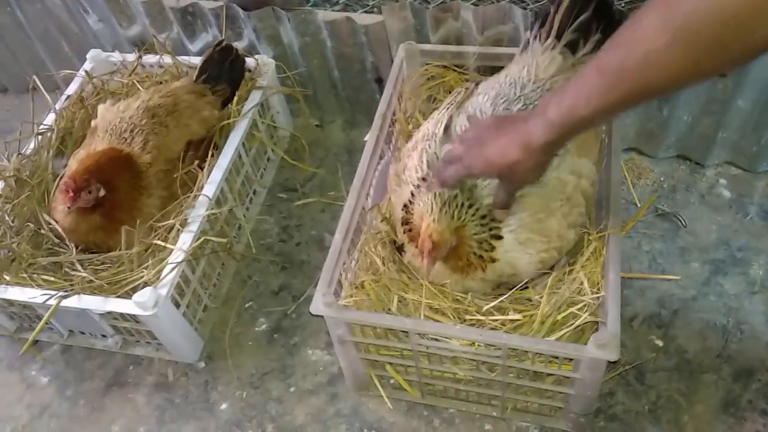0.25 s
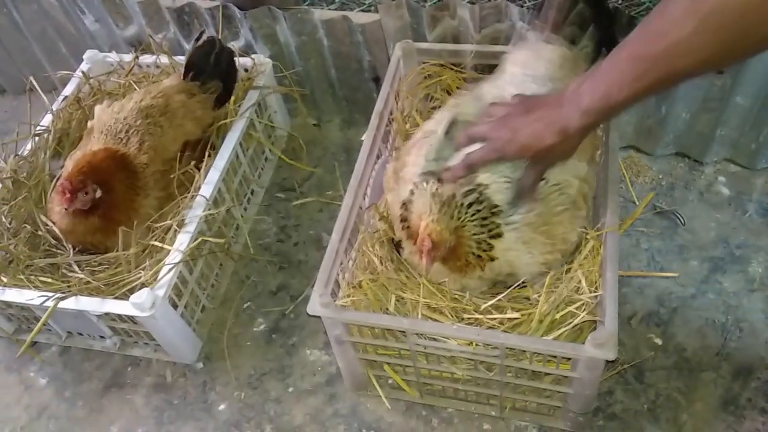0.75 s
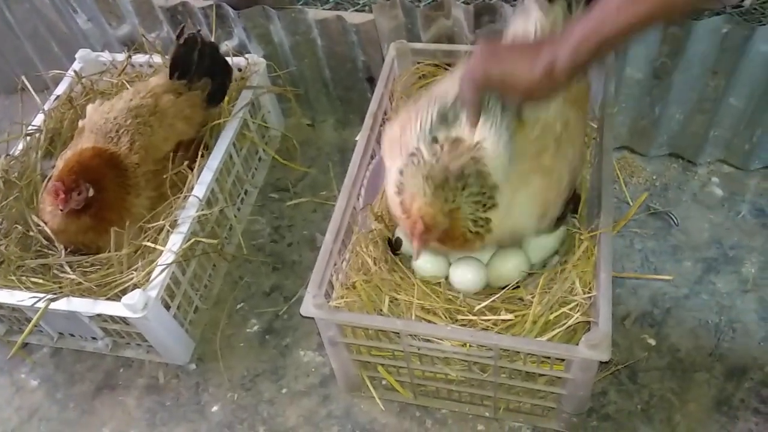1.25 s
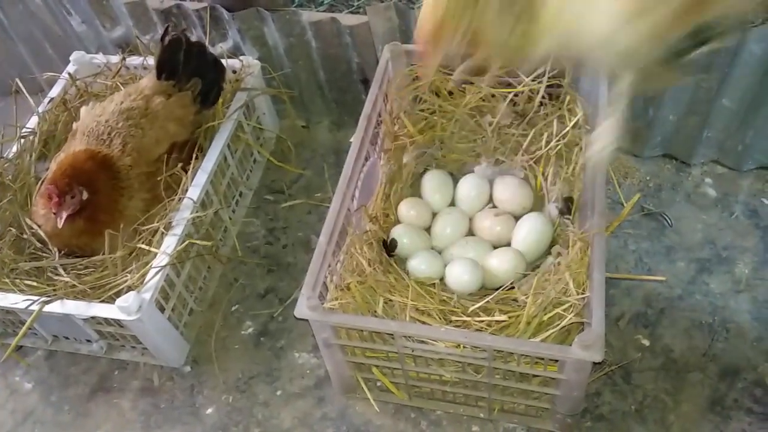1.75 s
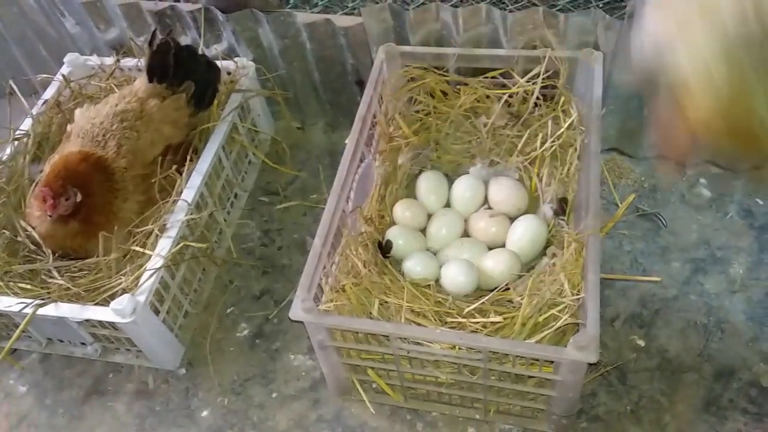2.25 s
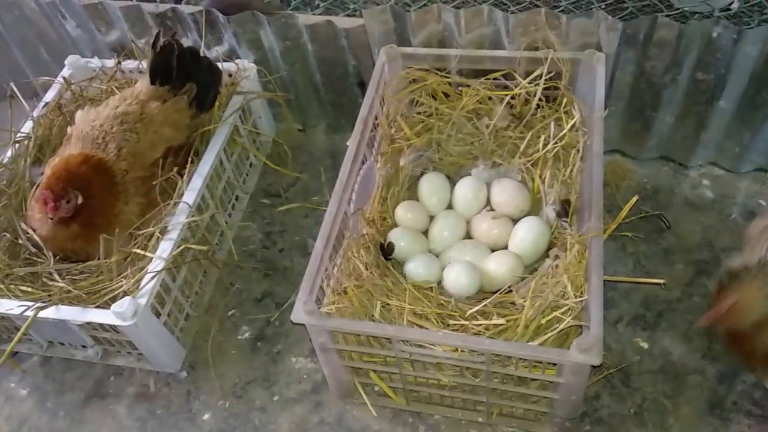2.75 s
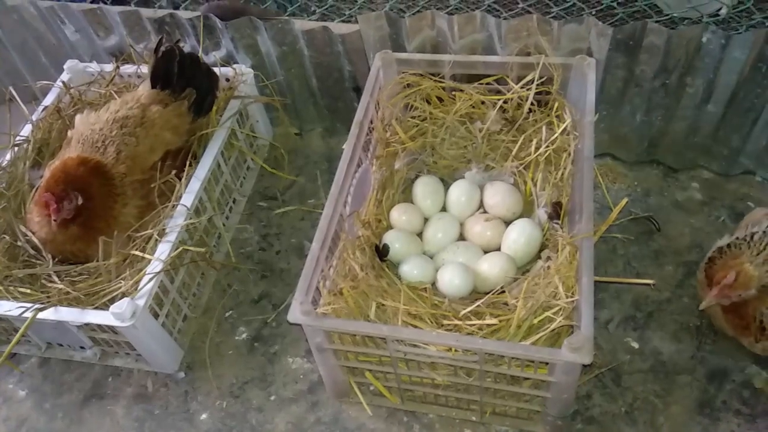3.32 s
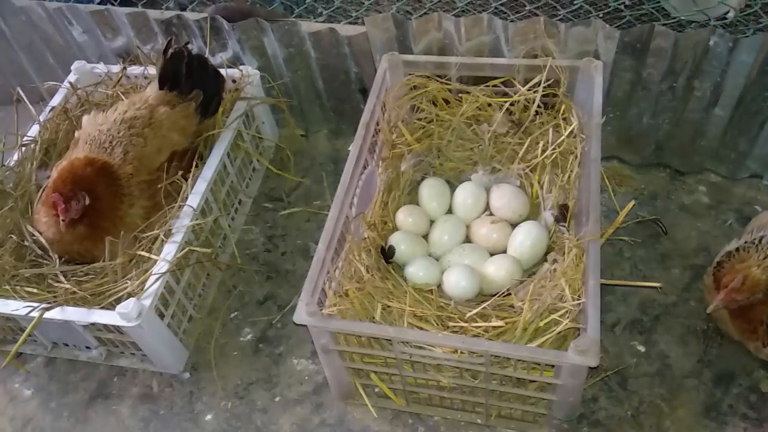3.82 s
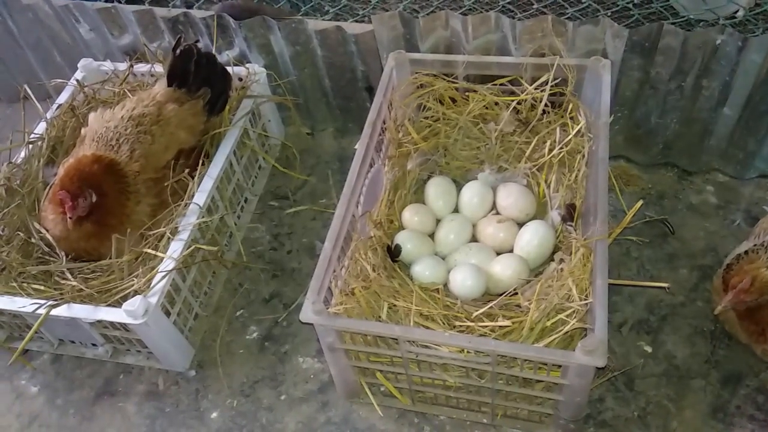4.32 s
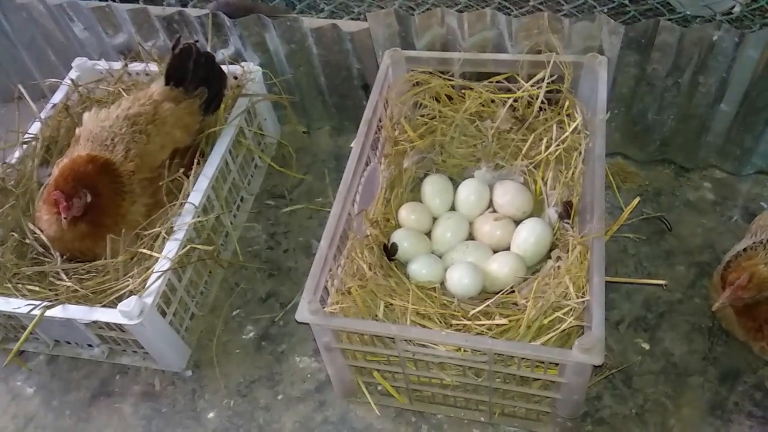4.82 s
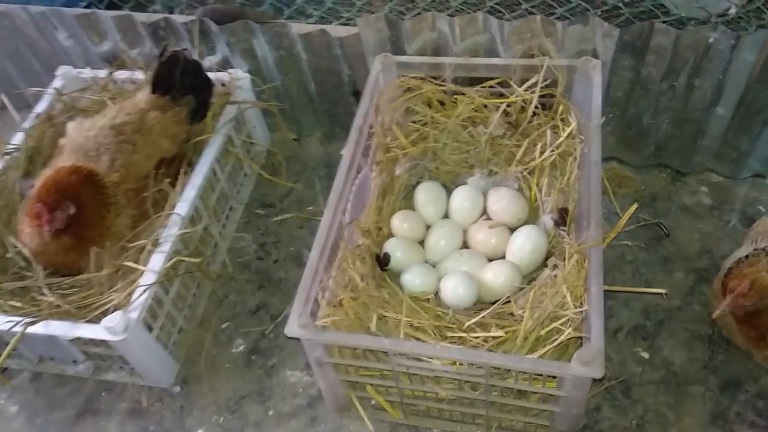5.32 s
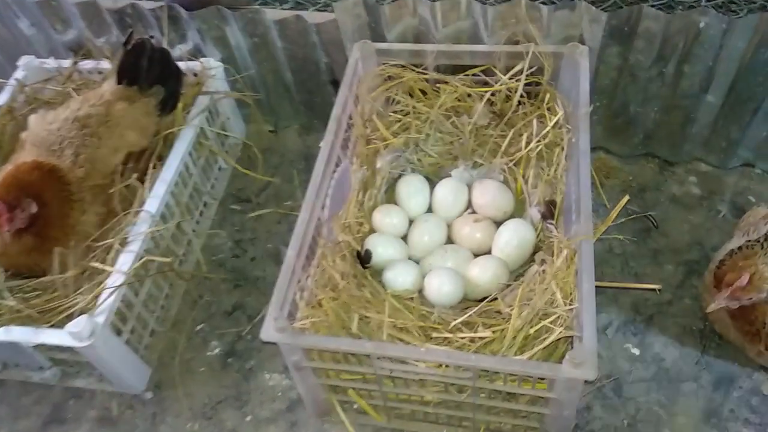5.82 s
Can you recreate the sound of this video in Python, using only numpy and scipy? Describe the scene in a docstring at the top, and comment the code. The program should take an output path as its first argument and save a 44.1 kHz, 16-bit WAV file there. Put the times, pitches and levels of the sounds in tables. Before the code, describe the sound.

A hen squawks close by right at the start, a loud, high cry that breaks into a hoarse rasp. A fainter squawk follows near 0.6 seconds, another loud one from 0.8 to 1.2, and several more that trail off by 2.2 seconds. At about 2.4 she gives one sharp cluck, then soft, low clucks roughly every third to half second, with a faint drawn-out grumble around 5 seconds and two more clucks near the end.

Throughout all six seconds, many chicks cheep and peep, some near and shrill, others a distant chorus, with occasional hissing chirps. Straw crackles in short bursts over a quiet shuffle of wings and feet. Soft, dull bumps of a crate and feet come around 0.6, 1.2, 2.4 and 3.6 seconds. The small shed adds a short echo and blurs distant poultry into a faint din.

```python
"""A broody hen squawks hoarsely as she is lifted off her nest, lands, and then clucks, in a tin-walled shed.
Her squawks are oscillations of the syrinx membranes, which break into a rasp under strain; her clucks are
pulse trains filtered by the resonances of the throat. Chicks cheep, peep and hiss all the while, near and
far. Straw crackles, wings and feet shuffle, the crate bumps, and reflections from the walls blur distant
poultry into a din."""
import sys
import numpy as np
from scipy import signal
from scipy.fft import rfft, irfft, next_fast_len
from scipy.io import wavfile
from scipy.ndimage import uniform_filter1d

SR = 44100
rng = np.random.default_rng(int(sys.argv[2]) if len(sys.argv) > 2 else 0)


def wav_out(sig):
    """Save sig, one row per channel (or a flat mono array), as 16-bit PCM at SR to the path in sys.argv[1]."""
    wavfile.write(sys.argv[1], SR, np.round(np.clip(np.atleast_2d(sig).T, -1, 1) * 32767).astype(np.int16))


N = 267687

# the hen's squawks, one contour each: time_s, pitch_hz, level_db, hoarseness (0 to 1)
SQUAWK_CONTOURS = [
    [(0, 1720, -21, .03), (.062, 1570, -13, .06), (.108, 1420, -19, .45), (.132, 1680, -14, .04),
     (.15, 1380, -19, .75), (.235, 1240, -19, .75), (.256, 1200, -27, .8), (.37, 1220, -25, .55),
     (.41, 1220, -41, .3)],
    [(.57, 1580, -36, .4), (.61, 1530, -28, .1), (.655, 1700, -29, .06), (.69, 1650, -36, .2)],
    [(.84, 1150, -29, .45), (.91, 1100, -22, .6), (.945, 1380, -18, .3), (.99, 1620, -16, .25),
     (1.04, 1680, -15, .15), (1.085, 1500, -19, .45), (1.108, 1680, -17, .1), (1.165, 1350, -22, .6),
     (1.23, 1000, -31, 1)],
    [(1.36, 1550, -36, .2), (1.38, 1300, -26, .3), (1.398, 1100, -24, .8), (1.42, 1200, -36, 1)],
    [(1.55, 1600, -31, .2), (1.63, 1920, -25, .05), (1.69, 1900, -38, .05), (1.74, 1850, -26, .05),
     (1.764, 1620, -21, .1), (1.81, 1800, -19, .05), (1.856, 1320, -19, .2), (1.872, 1150, -24, 1),
     (1.92, 1200, -32, 1)],
    [(1.98, 1400, -36, .8), (2.02, 1350, -30, 1), (2.07, 1200, -34, 1), (2.115, 1000, -30, 1),
     (2.2, 1000, -37, 1)],
]
# harmonics of a squawk: pitch_multiple, level_db
SQUAWK_HARMONICS = [(1, -5.5), (2, -24), (3, -38), (4, -36.5)]
# clucks and low grumbles, and at 0.726 s a brief low burst within the squawk: start_s, length_s,
# start_pitch_hz, end_pitch_hz, level_db, beak_opening_db
CLUCK_CALLS = [(0.312, 0.25, 287.6, 260.7, -42, -45), (0.726, 0.029, 301, 299, -30, -6),
               (2.372, 0.022, 377, 372, -18, 17.5), (2.457, 0.031, 243, 231.6, -32, -12),
               (2.538, 0.092, 242, 252, -46.5, -65), (2.749, 0.033, 263.5, 285, -29.5, -7),
               (3.055, 0.047, 211, 294, -34.5, -39), (3.355, 0.048, 220, 298, -35.5, -15),
               (3.683, 0.05, 217, 285, -36, -21), (4.158, 0.05, 200.6, 280, -35, -38),
               (4.467, 0.059, 228, 304, -39, -17), (4.768, 0.31, 397, 304.5, -46, -42),
               (5.037, 0.18, 323, 247.7, -45, -47), (5.446, 0.052, 198, 285, -35.5, -11),
               (5.81, 0.081, 201.2, 287.6, -35, -24)]
# resonances of the hen's throat: centre_hz, bandwidth_hz, gain_db
THROAT_FORMANTS = [(327, 105, -18), (799, 97, 8.5), (1450, 115, 0.5), (2780, 180, -2.5)]
# cheeps of the nearest chicks: start_s, length_s, pitch_hz, glide_octaves, level_db
CHEEP_CALLS = [(0, .048, 2890, 0.059, -18), (0.047, 0.03, 2094, -0.026, -25),
               (0.553, .084, 3840, .06, -24.5), (0.755, .08, 2583, -0.3, -20.5),
               (0.827, .035, 2790, 0.16, -19.5), (0.928, 0.058, 4270, -0.063, -23.5),
               (0.976, .09, 2984, 0.19, -19.5), (1.044, .043, 3610, -.02, -21),
               (1.092, .051, 2980, -0.33, -20), (1.14, .068, 3980, 0.051, -21.5),
               (1.201, .04, 3375, 0.013, -23), (1.439, 0.039, 3620, -0.095, -20),
               (1.458, 0.042, 2848, -.2, -20), (1.509, 0.069, 3010, -0.31, -17.5),
               (1.69, 0.046, 2860, -.15, -26), (1.856, 0.038, 2954, -0.091, -22.5),
               (2.119, 0.079, 2804, -0.071, -20), (2.406, .036, 3660, 0.11, -20.5),
               (2.427, .041, 4240, 0.22, -19), (2.492, .089, 2956, -0.047, -24.5),
               (2.64, .057, 2600, -.41, -20.5), (2.733, .022, 3040, 0.026, -16.5),
               (2.846, .05, 2713, -0.18, -19), (2.902, .036, 4990, -0.063, -18),
               (3.019, .066, 3060, 0.01, -20.5), (3.19, .06, 2643, -0.26, -20),
               (3.281, .087, 2777, -0.32, -18.5), (3.351, .059, 2940, -0.22, -19),
               (3.569, .095, 3115, -0.16, -19), (3.623, .04, 3840, 0.15, -21),
               (3.797, .077, 2880, -.43, -22), (3.847, 0.051, 3900, 0.097, -25.5),
               (3.895, 0.071, 2880, -0.28, -22), (4.032, 0.091, 2804, -0.2, -22.5),
               (4.348, .042, 3050, -.17, -18), (4.4, .085, 3770, 0.054, -26.5),
               (4.479, .03, 3060, 0.07, -13), (4.524, 0.09, 2810, -0.264, -24),
               (4.679, 0.072, 2794, -0.064, -27), (4.845, .032, 3115, -0.059, -18.5),
               (4.861, .095, 4020, -0.099, -23), (4.953, .061, 2664, -0.43, -17),
               (5.068, .11, 3300, 0.1, -19.5), (5.189, .094, 2827, -0.028, -24),
               (5.405, .037, 2650, -0.14, -30), (5.52, .05, 2850, -0.21, -26.5),
               (5.672, .045, 2707, -.12, -22.5), (5.813, .065, 2907, -0.16, -22),
               (5.888, 0.037, 2706, -0.22, -27), (5.97, .079, 2765, 0.013, -22)]
# shrill peeps, loudest on harmonic two: start_s, length_s, second_harmonic_hz, glide_octaves, level_db
PEEP_CALLS = [(.07, .01, 10400, 0.021, -19.5), (.107, .01, 10500, 0.085, -32),
              (.145, .008, 10800, -0.032, -25), (0.237, 0.022, 6450, 0.14, -12.5),
              (0.264, 0.064, 6650, 0.044, -21.5), (0.368, 0.025, 6420, 0.094, -15),
              (0.431, 0.0244, 6520, -0.012, -15.5), (.651, 0.035, 6850, .07, -17.5),
              (1.316, 0.015, 6300, 0.35, -13), (1.377, 0.027, 5760, 0.034, -17.5),
              (1.878, 0.027, 6750, 0.098, -23.5), (2.037, 0.049, 5800, 0.13, -28),
              (2.219, .021, 5800, -0.17, -26), (2.578, 0.092, 6450, -0.03, -21),
              (2.984, 0.035, 6500, 0.064, -23), (3.268, 0.03, 5950, -0.072, -19),
              (3.445, 0.016, 5950, 0.19, -19), (3.499, .02, 5950, 0.11, -18),
              (3.65, 0.054, 5700, -0.013, -27), (3.745, 0.031, 5720, -0.046, -22),
              (3.952, 0.045, 5700, -0.2, -22.5), (4.253, 0.026, 6560, 0.029, -13),
              (4.287, .068, 6550, -0.0039, -23), (4.674, 0.031, 5550, -0.068, -18.5),
              (4.838, 0.042, 6600, 0.062, -22.5), (5.83, 0.04, 5720, 0, -24),
              (5.903, 0.023, 6300, .3, -21.5)]
# harmonics of a peep: multiple_of_loudest, level_db
PEEP_HARMONICS = [(.5, -11.5), (1, -1.5), (1.5, -13.5), (2, -27)]
# harsh, hissing chirps: start_s, length_s, level_db
RASP_CALLS = [(0.531, 0.045, -18.5), (0.643, 0.074, -18), (1.303, 0.18, -27), (1.638, 0.1, -18),
              (1.833, 0.073, -26), (2.575, 0.064, -33), (2.784, 0.033, -19), (3.942, 0.03, -23),
              (4.639, 0.05, -23.5), (4.805, 0.063, -22.5), (5.048, 0.091, -19.5), (5.61, 0.067, -24)]
# spectra of a peep's breath and of a rasp: frequency_hz, level_db
BREATH_SPECTRUM = [(4000, -4), (6500, 8), (8300, -13), (10200, 4), (11500, -4), (15500, -8)]
RASP_SPECTRUM = [(2470, -35), (4200, -46), (5070, -4), (5610, -8), (6090, -9), (6890, 3), (8500, -11),
                 (10300, -8), (12300, -19), (15100, -19), (15800, -28)]
# envelopes of the far chicks' cheeping and of their thin, high twitter: time_s, level_db
CHEEPING_ENVELOPE = [(0, -28), (.35, -36), (.7, -24.5), (1.25, -29.5), (1.5, -24.5), (1.95, -31.5),
                     (2.6, -26), (2.92, -28), (3.3, -21), (3.7, -24.5), (4.5, -24.5), (4.85, -26.5),
                     (5.1, -24), (5.5, -28.5), (6.07, -23.5)]
TWITTER_ENVELOPE = [(0, -21.5), (.17, -42), (.6, -32), (.95, -40.5), (1.45, -29), (2.2, -26.5),
                    (2.45, -32.5), (2.65, -26), (3.1, -36.5), (3.4, -31.5), (4, -32), (4.5, -49),
                    (4.72, -23), (5, -50), (5.85, -29.5), (6.07, -40)]
# partials of the far chicks' calls: pitch_multiple, relative_level_db
FAR_CHEEP_PARTIALS = [(1, 23), (2, -23), (3, -43)]
WHISTLE_PARTIALS = [(1, 11), (2, 5.5), (3, -24)]
TWITTER_PARTIALS = [(1, 6), (1.5, -22)]
# bouts of stirring in the nest: start_s, length_s, crackle_db, shuffle_db
NEST_STIRS = [(0, .2, -33, -56), (0.647, .2, -32, -44.5), (0.944, 0.29, -30, -48.5),
              (1.362, 0.31, -30, -44.5), (1.65, 0.3, -28, -50), (1.966, 0.28, -33.5, -45.5),
              (2.395, 0.11, -26, -39), (2.542, 0.283, -26.5, -46.5), (2.89, .15, -30, -48.5),
              (3.185, .8, -34.5, -46.5), (4.205, 0.11, -28.5, -46.5), (4.62, 0.37, -33.5, -44.5),
              (5.04, 0.12, -32, -42.5), (5.434, 0.046, -34.5, -43), (5.618, 0.41, -28.5, -47)]
# dull bumps of the crate and of feet: start_s, level_db
IMPACTS = [(0.579, -31), (1.15, -31.5), (1.189, -35), (1.699, -43), (2.439, -39), (3.28, -41), (3.619, -34),
           (3.659, -38)]
# spectra of the straw, the shuffling, the bumps and the din's wash: frequency_hz, level_db
STRAW_SPECTRUM = [(2060, -23), (3500, -7.5), (3800, -5), (4800, -2.5), (5730, -3), (6340, -4.5),
                  (10400, -4.5), (11300, -10), (15200, -15), (15800, -19)]
SHUFFLE_SPECTRUM = [(15, -36), (25, -3.5), (181, -4), (233, 2), (279, -2), (384, 1), (545, -3), (700, -3.5),
                    (910, -3), (1540, -120)]
BUMP_SPECTRUM = [(60, 8.6), (110, 15), (190, 2.3)]
DIN_SPECTRUM = [(400, -19.5), (700, 1), (1100, 4), (1600, 8), (2300, 10), (3800, 1), (5000, -32),
                (9000, -32)]
# envelope of the distant poultry: time_s, level_db
DIN_ENVELOPE = [(0, -27.5), (.2, -38), (.44, -37), (.8, -29), (1.3, -36), (1.9, -32), (2.6, -37.5),
                (3.3, -34.5), (3.9, -36.5), (4.6, -33.5), (5.15, -35.5), (5.8, -34.5)]
# brief changes in the background level, nearly all dips: centre_s, half_length_s, change_db
BACKGROUND_LULLS = [(0.318, 0.026, -4.5), (.49, 0.018, -2.5), (1.286, 0.027, 1), (2.34, 0.046, -3),
                    (4.184, 0.12, -6), (4.555, 0.021, -6), (4.985, 0.029, -19), (5.338, 0.092, -11)]


def squawks(lurch_depth=.0902, rasp_depth=.1595, break_drop=.1, ceiling_hz=1930, undertone_db=-10):
    """Nonlinear oscillation: the strained syrinx lurches in pitch and breaks, more often when hoarse."""
    out, t = np.zeros(N), np.arange(N) / SR
    lurch, jitter, flutter, strain, scatter = (wander(hz) for hz in (81.5, 576, 430, 54.5, 442))
    for contour in SQUAWK_CONTOURS:
        on = (t >= contour[0][0]) & (t <= contour[-1][0])
        hz, db, hoarseness = np.array(curves(contour))[:, on]
        broken = np.clip(strain[on] + 3 * hoarseness - 1.2, 0, 1)
        bend = lurch_depth * np.sqrt(hoarseness) * lurch[on]
        roughness = rasp_depth * hoarseness ** 1.48 * jitter[on]
        drop = break_drop * broken * (1 - hoarseness)
        pitch_hz = np.minimum(hz * np.exp(bend + roughness - drop), ceiling_hz)
        # in a break the membranes slip into an unsteady slower swing, which adds a lower partial
        undertone = broken * syrinx(pitch_hz * .62 * np.exp(.22 * scatter[on]), [(1, 0)])
        tone = syrinx(pitch_hz, SQUAWK_HARMONICS) + from_db(undertone_db) * undertone
        shimmer_db = 5.5 * hoarseness * flutter[on] + 2.1 * lurch[on]
        tone = evened(tone * from_db(shimmer_db), span_s=.028)
        out[on] += tone * from_db(db) * swell(np.linspace(0, 1, on.sum()), edge=.0066)
    # the squawk has a dip near 2150 Hz and little below 650 Hz
    out = signal.lfilter(*signal.iirnotch(2150, 3, fs=SR), out)
    return signal.sosfilt(signal.butter(4, 650, "high", fs=SR, output="sos"), out)


def clucks(jitter=.087):
    """Source and filter: pulses excite the throat's formants, and the upper ones need an open beak."""
    out = np.zeros(N)
    for start_s, length_s, start_hz, end_hz, db, beak_db in CLUCK_CALLS:
        u = progress(length_s)
        wobble = np.interp(u, np.linspace(0, 1, 10), rng.standard_normal(10))
        pitch_hz = (start_hz + (end_hz - start_hz) * u) * (1 + jitter * wobble)
        pulses = np.diff(np.floor(np.cumsum(pitch_hz) / SR), prepend=-1)
        tone = 0
        for k, (centre_hz, bandwidth_hz, gain_db) in enumerate(THROAT_FORMANTS):
            ring = signal.lfilter(*signal.iirpeak(centre_hz, centre_hz / bandwidth_hz, fs=SR), pulses)
            tone += (-1) ** k * ring * from_db(gain_db + beak_db * min(k, 2) / 2)
        add(out, start_s, from_db(db) * swell(u, edge=.059) * unit_rms(tone))
    return out


def near_chicks(typical_hz=2920, brightening_db_per_octave=28, breath_db=-11.5):
    """Membrane tension: the higher a cheep, the steadier and brighter it is. Peeps carry breath noise."""
    out, breath = np.zeros(N), np.zeros(N)
    cheep_tremble, peep_tremble = .038 * wander(508), .014 * wander(600)
    for start_s, length_s, hz, glide, db in CHEEP_CALLS:
        slack = min((typical_hz / hz) ** .66, 1.2)
        overtone_db = -22 + brightening_db_per_octave * np.log2(hz / typical_hz)
        harmonics = [(1, 0), (2, overtone_db), (3, overtone_db - 17.5)]
        add(out, start_s, from_db(db) * chirp(length_s, arch(hz, glide), harmonics, slack * cheep_tremble))
    for start_s, length_s, hz, glide, db in PEEP_CALLS:
        add(out, start_s, from_db(db) * chirp(length_s, arch(hz, glide), PEEP_HARMONICS, peep_tremble))
        add(breath, start_s, from_db(db + breath_db) * swell(progress(length_s), edge=.054))
    return out + breath * coloured(rng.standard_normal(N), BREATH_SPECTRUM)


def rasps(fade_db=2.1):
    """Noise excitation: fluttering hiss in the throat's upper resonances gives chirps of no clear pitch."""
    envelope = np.zeros(N)
    for start_s, length_s, db in RASP_CALLS:
        u = progress(length_s)
        add(envelope, start_s, from_db(db - fade_db * u) * swell(u, edge=.064))
    hiss = rng.standard_normal(N) * from_db(2.6 * wander(400))
    return envelope * coloured(hiss, RASP_SPECTRUM)


def far_chicks_and_rasp_grain(whistle_mean_db=-34, grain_db=-11):
    """Superposition: far cheeps, whistles and twitter form a chorus; short tones give the rasps a grain."""
    cheep_db, twitter_db = curves(CHEEPING_ENVELOPE)[0], curves(TWITTER_ENVELOPE)[0]
    cheeps = crowd(2830, FAR_CHEEP_PARTIALS, count=260, typical_s=.042, spread=.22,
                   shape=[1.05, 1.02, .89], jitter=.027)
    whistles = crowd(3950, WHISTLE_PARTIALS, count=330, typical_s=.028, spread=.23,
                     shape=[.95, 1.02, .98], jitter=.013)
    high_tones = crowd(5950, TWITTER_PARTIALS, count=320, typical_s=.02, spread=.2,
                       shape=[.97, 1.02, 1], jitter=.017)
    whistle_db = whistle_mean_db + 1.2 * (cheep_db - cheep_db.mean())
    chorus = from_db(cheep_db) * cheeps + from_db(whistle_db) * whistles + from_db(twitter_db) * high_tones
    # each rasp has a grain of short, high tones that lingers briefly after it
    rasp_grain = from_db(grain_db) * bouts(RASP_CALLS, release_s=.021) * high_tones
    return from_db(lull_db()) * chorus + rasp_grain


def straw(stalk_count=44, snaps_per_s=2500, bandwidth_hz=160, patchy_db=7):
    """Impulse excitation: straws snap and swish, each stalk ringing briefly at its own frequency."""
    stalks = np.zeros(N)
    for hz in np.linspace(3500, 15500, stalk_count):
        rubbing_db = patchy_db * np.interp(np.arange(N), np.linspace(0, N, 240), rng.standard_normal(240))
        snaps = rng.standard_normal(N) * (rng.random(N) < snaps_per_s / SR) * from_db(rubbing_db)
        stalks += signal.lfilter(*signal.iirpeak(hz, hz / bandwidth_hz, fs=SR), snaps + 1e-18)
    return coloured(shed(stalks, wet_db=-8.5), STRAW_SPECTRUM)


def nest(crackle_rest_db=-34.5, shuffle_rest_db=-49.5, settle_s=.024):
    """Addition of powers: bouts of stirring rise over a constant rustle of straw, wings and feet."""
    stirs, dip_db = np.array(NEST_STIRS), lull_db()
    crackle_gain = np.hypot(from_db(crackle_rest_db + dip_db), bouts(stirs[:, [0, 1, 2]], settle_s))
    shuffle_gain = np.hypot(from_db(shuffle_rest_db + .29 * dip_db), bouts(stirs[:, [0, 1, 3]], settle_s))
    crackle = straw()
    shuffle = coloured(rng.standard_normal(N) * from_db(3.1 * wander(32.3)), SHUFFLE_SPECTRUM)
    return crackle_gain * crackle + shuffle_gain * shuffle


def bumps(rise_s=.0051, decay_s=.013):
    """Heavy damping: soft knocks of the crate and of feet die away at once."""
    envelope, t = np.zeros(N), np.arange(SR // 4) / SR
    for start_s, db in IMPACTS:
        add(envelope, start_s, from_db(db) * (1 - np.exp(-t / rise_s)) * np.exp(-t / decay_s))
    return envelope * coloured(rng.standard_normal(N), BUMP_SPECTRUM)


def din(lull_share=.43):
    """Diffuse field: the walls blur the calls of distant poultry into a wash."""
    calls = crowd(1650, [(1, 0)], count=260, typical_s=.04, spread=.55,
                  shape=[1.03, 1.02, .93], jitter=.032)
    wash = coloured(rng.standard_normal(N), DIN_SPECTRUM)
    level_db = curves(DIN_ENVELOPE)[0] + lull_share * lull_db()
    return from_db(level_db) * (from_db(-3) * calls + from_db(-1) * wash)


def crowd(pitch_hz, partials, count, typical_s, spread, shape, jitter):
    """Incoherent sources: short calls at random times and pitches sum to a steady power."""
    out, tremble = np.zeros(N), jitter * wander(350)
    for k, (offset, size, sharp, flat) in enumerate(rng.random((count, 4))):
        contour_hz = pitch_hz * np.array(shape) * np.exp(spread * (sharp - flat))
        length_s = typical_s * (.5 + size)
        start_s = (k + offset) / count * N / SR - length_s / 2
        add(out, start_s, from_db(rng.normal(0, 5)) * chirp(length_s, contour_hz, partials, tremble))
    return evened(shed(out, wet_db=5), span_s=.075)


def shed(x, wet_db, t60_s=.32):
    """Reverberation: direct sound, a few slaps off the tin walls, then a dense tail; power is kept."""
    t = np.arange(SR // 2) / SR
    slaps = rng.standard_normal(len(t)) * (rng.random(len(t)) < 500 / SR) * np.exp(-t / .016)
    tail = rng.standard_normal(len(t)) * from_db(-60 * t / t60_s)
    echo = (unit_rms(slaps) * from_db(-3.5) + unit_rms(tail)) * (t > .003)
    echo *= from_db(wet_db) / np.sqrt(np.sum(echo ** 2))
    return (x + signal.fftconvolve(x, echo)[:N]) / np.sqrt(1 + from_db(2 * wet_db))


def syrinx(hz, partials):
    """Periodic vibration: the membranes give partials locked to one phase."""
    phase = 2 * np.pi * np.cumsum(hz) / SR
    return np.sqrt(2) * sum(from_db(db) * np.sin(k * phase) * (k * hz < SR / 2) for k, db in partials)


def chirp(length_s, contour_hz, partials, tremble):
    """Frequency and amplitude modulation: a note arches through three pitches, trembling and fluttering."""
    u = progress(length_s)
    hz = np.polyval(np.polyfit([0, .5, 1], contour_hz, 2), u)
    pitch_at, flutter_at = (rng.random(2) * (N - SR)).astype(int)
    hz *= 1 + tremble[pitch_at:pitch_at + len(u)]
    flutter = unit_rms(from_db(104 * tremble[flutter_at:flutter_at + len(u)]))
    return swell(u, edge=.067) * flutter * syrinx(hz, partials)


def arch(hz, glide_octaves, sag_octaves=.025):
    """Start, middle and end pitch of a glide whose ends hang below the straight line."""
    return hz * 2 ** np.array([-glide_octaves / 2 - sag_octaves, 0, glide_octaves / 2 - sag_octaves])


def lull_db():
    """Gaussian dips in level as the birds pause and start again."""
    t = np.arange(N) / SR
    return sum(db * np.exp(-((t - centre_s) / half_s) ** 2) for centre_s, half_s, db in BACKGROUND_LULLS)


def bouts(rows, release_s, attack_s=.0077):
    """Gain of bouts that rise, hold and decay exponentially; overlaps add in power."""
    t, power = np.arange(SR) / SR, np.zeros(N)
    for start_s, length_s, db in rows:
        envelope = np.minimum(t / attack_s, 1) * np.exp(-np.maximum(t - length_s, 0) / release_s)
        add(power, start_s, (from_db(db) * envelope) ** 2)
    return np.sqrt(power)


def swell(u, edge):
    """Raised-cosine envelope: a call opens and closes, each over the fraction `edge` of its length."""
    return np.sin(np.pi / 2 * np.clip(np.minimum(u, 1 - u) / edge, 0, 1)) ** 2


def wander(rate_hz):
    """Low-pass noise: a smooth random fluctuation of unit power."""
    lowpass = signal.butter(4, rate_hz, fs=SR, output="sos")
    return unit_rms(signal.sosfilt(lowpass, rng.standard_normal(N + SR))[SR:])


def coloured(x, spectrum):
    """Spectral shaping to unit power, falling 20 dB an octave beyond the ends of the spectrum."""
    hz, db = np.transpose(spectrum)
    size = next_fast_len(N)
    octave = np.log2(np.maximum(np.fft.rfftfreq(size, 1 / SR), 1))
    outside = np.abs(octave - np.clip(octave, np.log2(hz[0]), np.log2(hz[-1])))
    gain = from_db(np.interp(octave, np.log2(hz), db) - 20 * outside)
    return unit_rms(irfft(rfft(x, size) * gain, size)[:N])


def evened(x, span_s):
    """Division by the running RMS takes out slow swells."""
    power = np.abs(uniform_filter1d(x ** 2, int(span_s * SR)))
    return x / np.sqrt(power + 1e-3 * np.mean(x ** 2))


def curves(rows):
    """Linear interpolation of each column over time_s, sample by sample."""
    time_s, *columns = np.transpose(rows)
    return [np.interp(np.arange(N) / SR, time_s, column) for column in columns]


def progress(length_s):
    """Normalised time, 0 to 1 over one call."""
    return np.linspace(0, 1, max(int(length_s * SR), 64))


def add(track, start_s, sound):
    """Superpose a sound on a track."""
    at = max(int(start_s * SR), 0)
    track[at:at + len(sound)] += sound[:max(N - at, 0)]


def from_db(db):
    """Decibels to amplitude ratio."""
    return 10 ** (np.asarray(db) / 20)


def unit_rms(x):
    """Normalisation to unit power."""
    return x / np.sqrt(np.mean(x ** 2) + 1e-20)


def scene():
    """Superposition: hen and chicks in the reverberant shed, over the nest and the din."""
    hen = shed(squawks(), wet_db=-4.5) + shed(clucks(), wet_db=-7)
    chicks = shed(near_chicks() + rasps(), wet_db=-.5)
    return (hen + chicks + far_chicks_and_rasp_grain() + nest() + bumps() + din())[None]


def record(dry, cutoff_hz=15800):
    """Soft saturation rounds the loudest peaks, and a steep low-pass cuts the top."""
    lowpass = signal.ellip(12, .1, 90, cutoff_hz, fs=SR, output="sos")
    return signal.sosfilt(lowpass, .9 * np.tanh(dry / .9))


dry = scene()
out = record(dry)
wav_out(out)
```